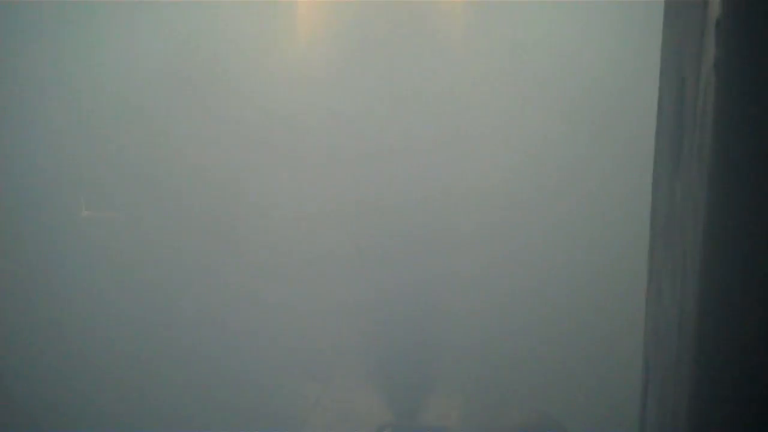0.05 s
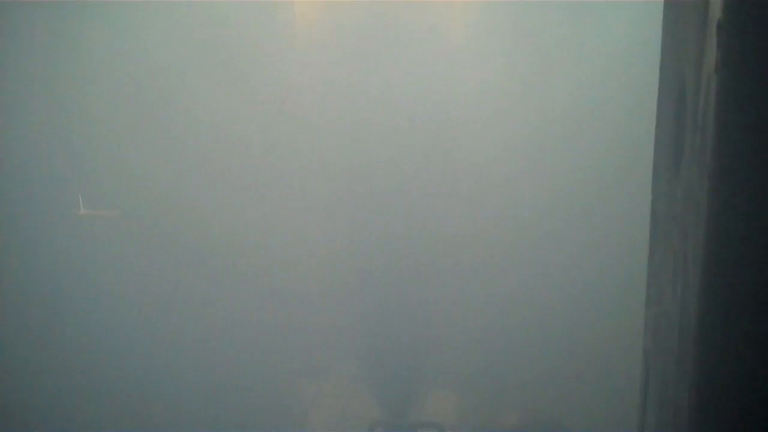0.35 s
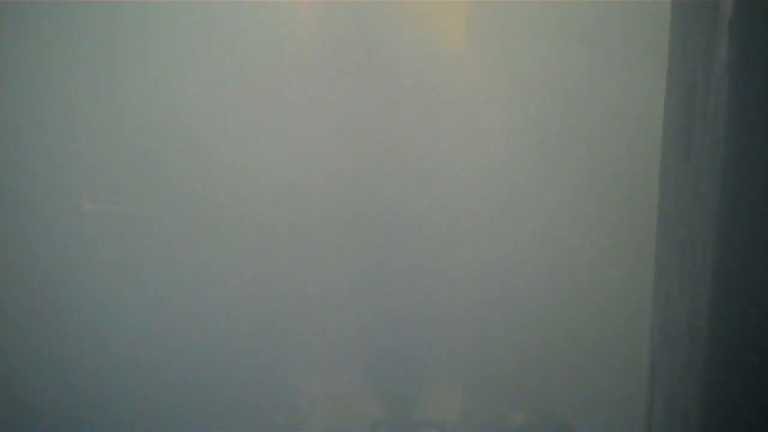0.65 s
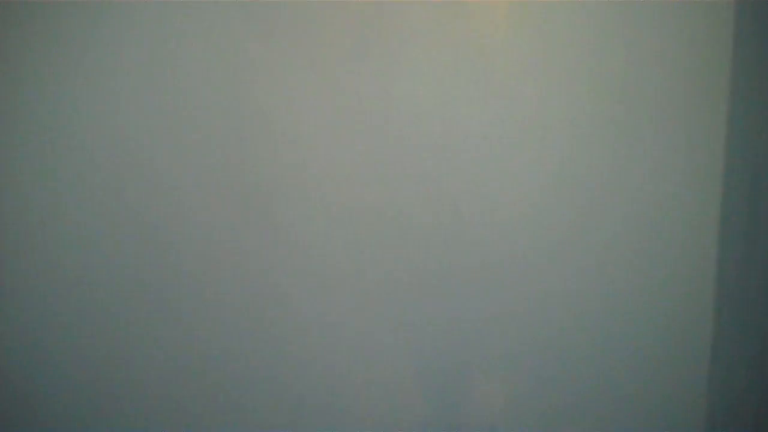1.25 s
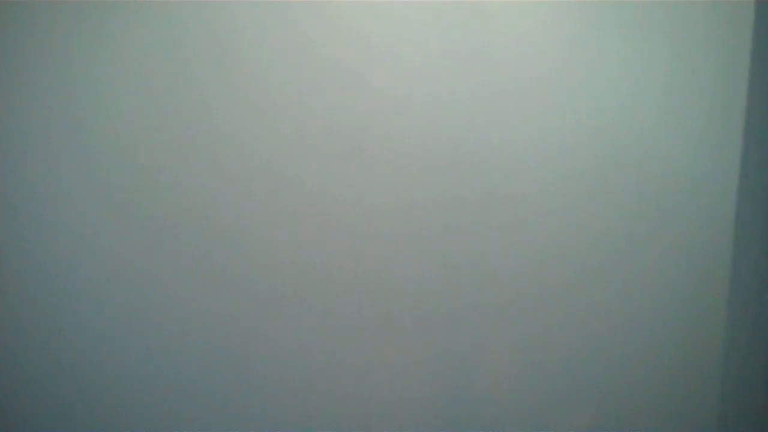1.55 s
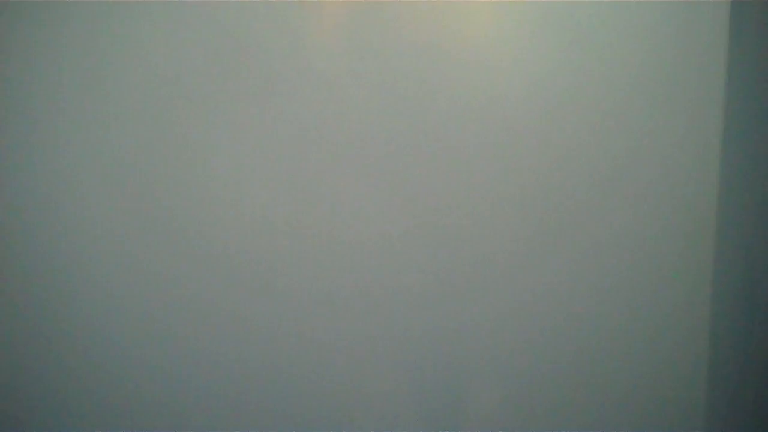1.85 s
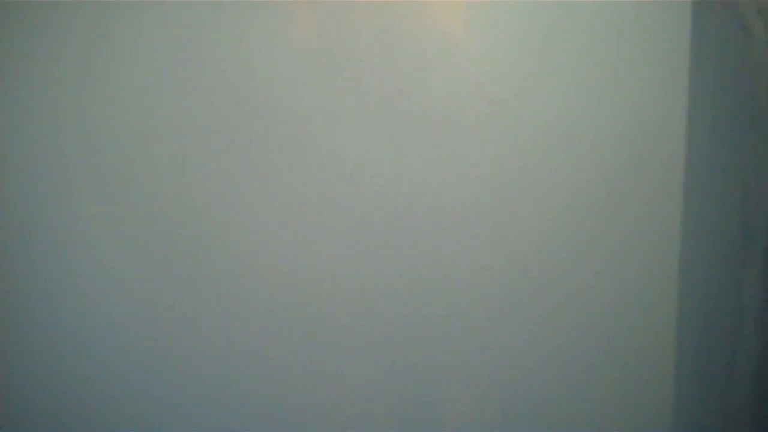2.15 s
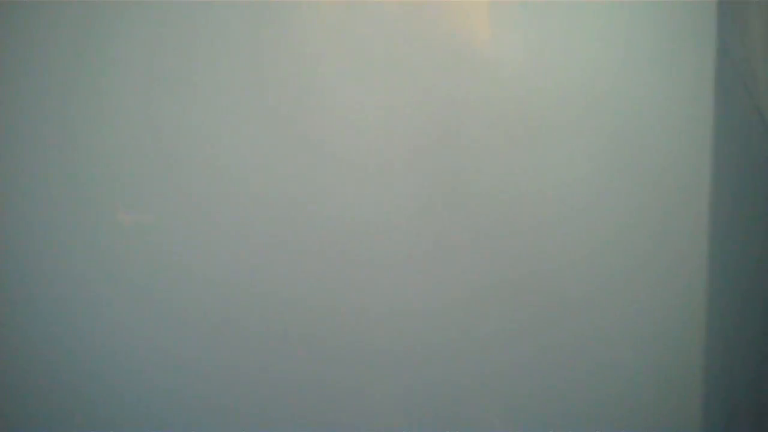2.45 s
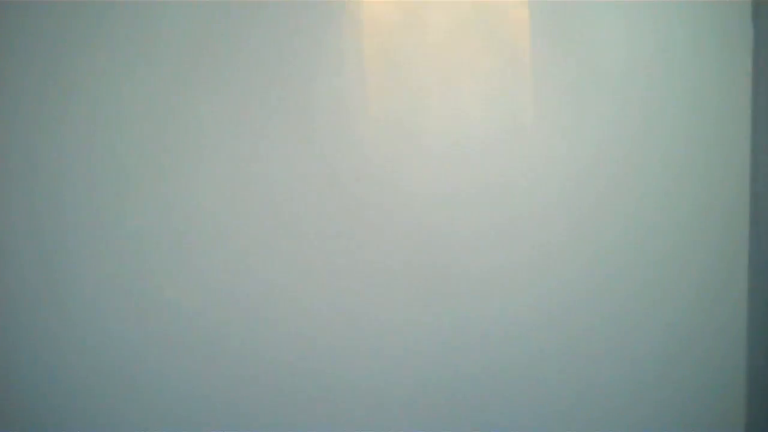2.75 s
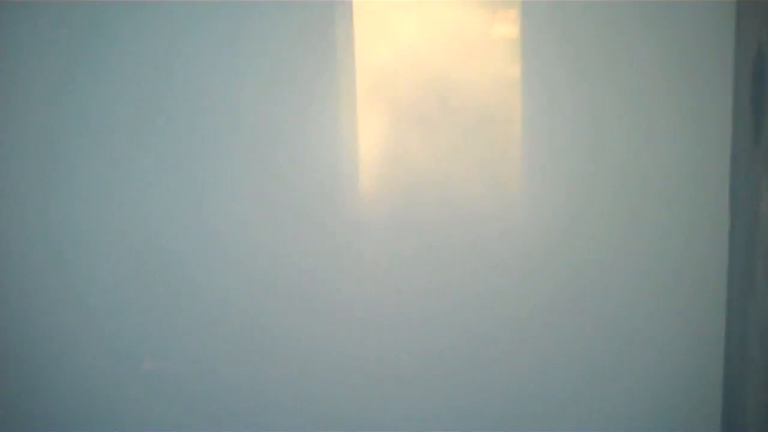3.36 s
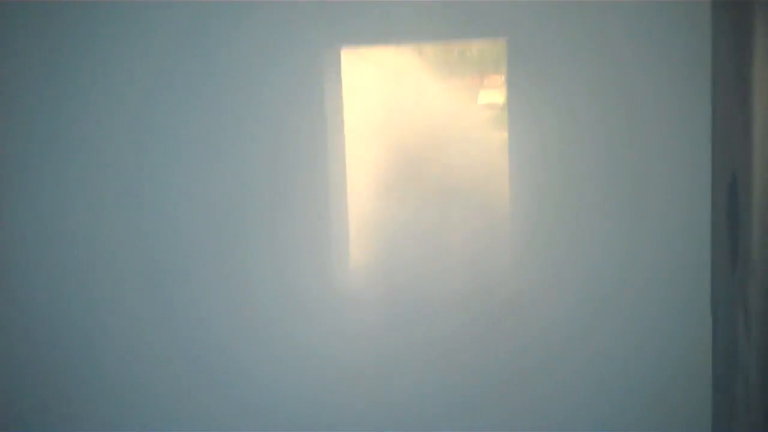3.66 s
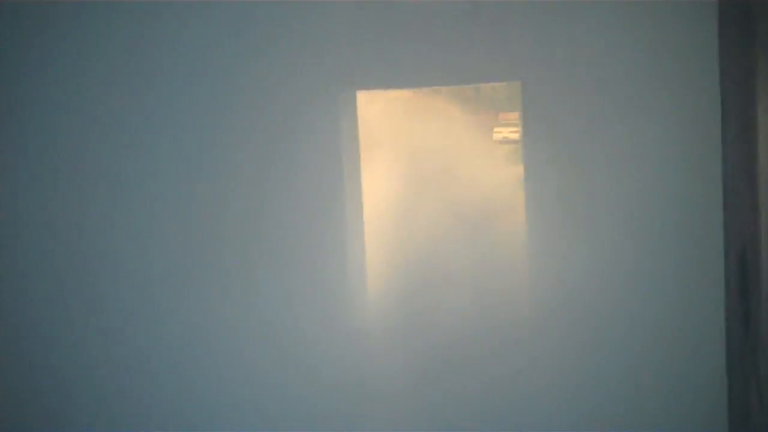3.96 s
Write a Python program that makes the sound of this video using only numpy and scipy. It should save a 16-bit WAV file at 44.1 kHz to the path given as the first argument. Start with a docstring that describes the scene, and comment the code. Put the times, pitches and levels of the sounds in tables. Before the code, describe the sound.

Water sprays from a nearby hose nozzle in a bare room. It starts as a soft hiss, swells to a loud, steady rush with splashing, then drums on the far wall as the aim shifts.

```python
"""A bare, smoky room. A hose nozzle sprays water: the jet breaks up in a soft hiss, then the valve
opens over a second to a full rush. The water roars and splashes as it lands, rings the room's
resonances and drums on the far wall as the aim shifts. The nozzle rings faintly as the valve moves.
A draught brushes the microphone at the start; its two ports ring at different treble pitches."""
import sys
import numpy as np
from scipy import signal
from scipy.fft import rfft, irfft
from scipy.io import wavfile

SR = 44100
rng = np.random.default_rng(int(sys.argv[2]) if len(sys.argv) > 2 else 0)


def master(y):
    """Save y as 16-bit WAV."""
    cut = np.clip(np.atleast_2d(y).T, -1, 1)
    pcm = np.round(cut * 32767)  # scale
    wavfile.write(sys.argv[1], SR, pcm.astype(np.int16))


N = 176400

# Nozzle flow. Each row: time in seconds, level in dB.
FLOW_DB = [(0.0,-53.5),(0.15,-54),(0.28,-52),(0.6,-54),(0.74,-52.5),(0.85,-54),(0.98,-48),(1.19,-44),(1.38,-41.5),(1.67,-37.7),(1.74,-37.5),(1.82,-36),(1.92,-37),
           (2.2,-37),(2.32,-35.5),(2.42,-37.2),(2.64,-36.5),(2.69,-35.8),(3.03,-36.5),(3.25,-37.5),(3.55,-37),(3.68,-37.5),(3.79,-36.5),(3.88,-38),(4.0,-37)]
# Jet breakup. Each row: frequency in Hz, spectral density in dB.
HISS_SPECTRUM = [(280,-30),(450,-7.5),(950,-11),(1360,-2.5),(1520,0),(1750,-1),(2000,1),(2300,1.5),(2900,0.5),(3400,1),(4200,0.5),(5000,0.5),(14000,-2)]
# Lower part of the hiss, thinned by low flow and aim. Each row: time in seconds, gain in dB.
HISS_BODY_DB = [(0,-1.3),(0.85,-0.5),(1.6,0),(2.3,-0.8),(3.1,0.4),(3.6,-1),(4,0)]
# Landing water. Each row: frequency in Hz, spectral density in dB.
ROAR_SPECTRUM = [(25,-43),(50,-31),(70,-28),(105,-19),(150,-11),(280,-6.5),(340,-5),(600,-3),(800,6.5),(1000,-3),(1300,-13),(2500,-15.5)]
# Near splash. Each row: frequency in Hz, spectral density in dB.
SPLASH_SPECTRUM = [(250,-25),(340,-10),(480,-17.5),(580,7),(720,0.5),(880,-5),(1060,5),(1330,-19),(1570,-3),(1850,-17),(2300,-18),(3200,-21.5)]
# Splash against aim. Each row: time in seconds, level in dB relative to the flow.
SPLASH_DB = [(0,-17),(1.0,-16),(1.7,-12),(2.55,-11.5),(3.0,-29),(3.4,-28),(4,-17)]
# Room modes. Each row: frequency in Hz, width in Hz, gain in dB, dB of change per dB of flow.
ROOM_RESONANCES = [(89,9.4,-39.5,1.15),(123,13,-38.5,0.88),(175.2,27,-38.5,0.93),(331.6,33,-31,0.48),(350.5,13.3,-23,1.33),(386,13,-24.5,0.91),(438.3,27,-24,1),(490.2,13.6,-16,1.28),(546,7,-24,1),(621.6,18.5,-25,0.63),(727.2,23,-19.5,1.1),(869.4,36,-23,0.5),(956.4,16.6,-20,0.96),(1026,23,-25.5,1.6),(1143,17,-24,0.95),(1248.4,31,-24,0.88),(1497,78,-28.5,0.66),(2090,21,-36,0.62),(2293,22,-28,1.8),(3410,39,-37,1)]
# Far wall modes. Each row: frequency in Hz, width in Hz, gain in dB.
WALL_RESONANCES = [(441,14,-22),(551,12,-22),(658.4,18,-18),(727,33,-18),(787,37,-19.5),(865,54,-16)]
# Jet on the wall. Each row: time in seconds, gain in dB.
WALL_HIT_DB = [(0,-48),(2.5,-17),(2.64,-8),(2.72,1.5),(2.83,-3),(2.93,-1.5),(3.1,-3),(3.45,-1.5),(3.63,-4),(3.72,0),(3.87,-1.5),(4,-8)]
# Wall brightness against aim. Each row: time in seconds, tilt in dB per octave.
WALL_TILT_DB_PER_OCT = [(2.6,3),(2.74,-8),(2.88,0),(3.1,0),(3.45,3),(3.72,0),(3.87,3),(4,3)]
# Late boom. Each row: time in seconds, level in dB relative to full flow.
BOOM_DB = [(3.3,-55),(3.58,-29),(3.88,-30.5),(4,-37)]
# Door frame and floor echoes. Each row: delay in ms, gain in dB.
ECHOES = [(2.7,-20),(5.9,-16),(8.3,-17.5),(13.1,-22),(21.4,-18.5)]
# Valve movements. Each row: time of the peak in seconds, gain in dB.
VALVE_MOVES = [(0.21,-62.5),(0.97,-57)]
# Nozzle modes. Each row: frequency in Hz, width in Hz, gain in dB.
NOZZLE_RESONANCES = [(854,32,-5.5),(955,25,-5.5)]
# Draught strength. Each row: time in seconds, level in dB.
DRAUGHT_DB = [(0,-58.5),(.14,-61.5),(.24,-65),(.34,-76),(.45,-76),(.54,-100)]
# Fresh draught. Each row: frequency in Hz, spectral density in dB.
FRESH_AIR_SPECTRUM = [(12,-10),(22,3),(55,2),(85,-13),(125,-26),(400,-53)]
# Slack draught. Each row: frequency in Hz, spectral density in dB.
SLACK_AIR_SPECTRUM = [(12,-4),(28,2),(45,-6),(80,-31),(400,-62)]
# Stereo likeness. Each row: frequency in Hz, left-right correlation from -1 to 1.
CORRELATION = [(100,0.99),(300,0.99),(850,0.98),(1300,.87),(2200,.91),(2900,0.88),(3600,0.56),(5200,0.49),(6300,0.29),(7200,0.16),(9000,0.059),(13000,-0.15)]
# Microphone ports. Each row: frequency in Hz, gain in dB.
LEFT_PORT_DB = [(3500,0.5),(5000,1),(6400,4),(7000,7.5),(7350,9),(7700,8.5),(8200,3.5),(9000,-1),(10200,-6),(14000,-10)]
RIGHT_PORT_DB = [(3500,0.5),(4900,2.5),(5800,8),(6300,9.5),(6900,1.5),(7400,-0.5),(8000,-5.5),(9000,-12.5),(10100,-16),(11500,-18.5),(14000,-28)]

BIN_HZ = np.arange(N // 2 + 1) * SR / N
TIME_S = np.arange(N) / SR


def from_db(db):
    return 10 ** (np.asarray(db) / 20)


def unit_rms(x):
    return x / np.sqrt(np.mean(x ** 2) + 1e-20)


def in_time(rows):
    return np.interp(TIME_S, *np.transpose(rows))


def at_hz(rows, hz):
    row_hz, value = np.transpose(rows)
    return np.interp(np.log(hz + 1e-9), np.log(row_hz), value)


def coloured(x, spectrum):
    gain = from_db(at_hz(spectrum, np.arange(N + 1) * SR / (2 * N)))
    return irfft(rfft(x, 2 * N) * gain)[..., :N]


def drift(rate_hz):
    """Low-passed random wander, rms 1."""
    return unit_rms(irfft(rfft(rng.standard_normal(N)) / (1 + (BIN_HZ / rate_hz) ** 2), N))


def stereo(pair):
    """Two independent signals to left and right: alike in the bass, apart in the treble."""
    alike = at_hz(CORRELATION, BIN_HZ)
    mid, side = rfft(pair)
    return irfft(np.sqrt(1 + alike) * mid + np.sqrt(1 - alike) * side * [[1], [-1]], N)


def turbulence(spectrum, flicker_db, rate_hz):
    """Stereo noise in 14 bands, each wandering by flicker_db; rms 1."""
    white = rfft(stereo(rng.standard_normal((2, N))))
    band = np.searchsorted(np.geomspace(200, 12000, 13), BIN_HZ)
    noise = sum(irfft(white * (band == k), N) * from_db(flicker_db * drift(rate_hz)) for k in range(14))
    return unit_rms(coloured(noise, spectrum))


def ringing(hz, width_hz):
    """Noise-driven resonance as two independent signals, rms 1."""
    response = 1 / (1 + 1j * (BIN_HZ - hz) / (.78 * width_hz)) ** 2
    return unit_rms(irfft(rfft(rng.standard_normal((2, N))) * response, N))


def jet(flow_db, drops_per_s=2500, patter_db=-11, flutter_db=0.71, body_edge_hz=3900):
    """The jet breaks up into a fluttering hiss and a fine patter of drops."""
    hiss = turbulence(HISS_SPECTRUM, flicker_db=0.7, rate_hz=10.5)
    drop_db = 0.5 * np.minimum(rng.exponential(1, (2, N)), 5)
    polarity = rng.choice([-1, 1], (2, N))
    hits = rng.random((2, N)) < drops_per_s / SR
    patter = unit_rms(coloured(stereo(from_db(drop_db) * polarity * hits), HISS_SPECTRUM))
    level_db = flow_db + 0.5 + flutter_db * drift(rate_hz=68)
    spray = from_db(level_db) * (hiss + from_db(patter_db) * patter)
    body = irfft(rfft(spray) / (1 + (BIN_HZ / body_edge_hz) ** 10), N)
    return spray - body + from_db(in_time(HISS_BODY_DB)) * body


def sizzle(level_db=-69):
    """Thin, steady nozzle sizzle, heard while the flow is low."""
    return from_db(level_db) * stereo(ringing(hz=7355, width_hz=410))


def landing(flow_db, roar_db=-14):
    """Water lands in a broad roar; the near splash dips as the aim moves away."""
    roar = turbulence(ROAR_SPECTRUM, flicker_db=0, rate_hz=14)
    splash = turbulence(SPLASH_SPECTRUM, flicker_db=1, rate_hz=21)
    return from_db(flow_db + roar_db) * roar + from_db(flow_db + in_time(SPLASH_DB)) * splash


def room(flow_db, full_flow_db, gain_db=-2.5):
    """Drops keep the room's modes ringing; each follows the flow by its own amount."""
    swing_db = flow_db - full_flow_db
    return sum(from_db(full_flow_db + gain_db + db + follows * swing_db) * ringing(hz, width_hz)
               for hz, width_hz, db, follows in ROOM_RESONANCES)


def wall(flow_db, pivot_hz=650):
    """The jet drums on the far wall, deep at first, brighter as the aim shifts."""
    hit_db = flow_db + in_time(WALL_HIT_DB)
    tilt_db_per_oct = in_time(WALL_TILT_DB_PER_OCT)
    return sum(from_db(hit_db + db + tilt_db_per_oct * np.log2(hz / pivot_hz)) * ringing(hz, width_hz)
               for hz, width_hz, db in WALL_RESONANCES)


def boom(full_flow_db):
    """The landing water adds a low boom near the end."""
    return from_db(full_flow_db + in_time(BOOM_DB)) * ringing(hz=227, width_hz=42)


def doorway(direct, sway_ms=0.073, sway_hz=0.62):
    """Short echoes comb the hiss; their delays wander as the holder sways."""
    now_ms = 1000 * TIME_S
    combed = direct
    for delay_ms, db in ECHOES:
        then_ms = now_ms - delay_ms - sway_ms * drift(sway_hz)
        echo = np.array([np.interp(then_ms, now_ms, side, left=0) for side in direct])
        combed = combed + from_db(db) * echo
    return combed


def draught(slacken_s=0.17):
    """Moving air rumbles on the microphone, sinks in pitch and dies away."""
    air = stereo(rng.standard_normal((2, N)))
    fresh = unit_rms(coloured(air, FRESH_AIR_SPECTRUM))
    slack = unit_rms(coloured(air, SLACK_AIR_SPECTRUM))
    fresh_share = np.exp(-(TIME_S / slacken_s) ** 4)
    return from_db(in_time(DRAUGHT_DB)) * (fresh_share * fresh + (1 - fresh_share) * slack)


def valve(rise_s=0.037, fall_s=0.074):
    """The nozzle rings briefly at each valve movement."""
    swell = sum(from_db(db) * np.exp(-np.maximum((peak_s - TIME_S) / rise_s, (TIME_S - peak_s) / fall_s))
                for peak_s, db in VALVE_MOVES)
    ring = sum(from_db(db) * ringing(hz, width_hz) for hz, width_hz, db in NOZZLE_RESONANCES)
    return swell * stereo(ring)


def scene():
    """Spray, landing water and its resonances over draught and valve."""
    flow_db = in_time(FLOW_DB)
    full_flow_db = np.mean(flow_db[N // 2:])
    spray = doorway(jet(flow_db) + sizzle())
    water = landing(flow_db)
    resonances = stereo(room(flow_db, full_flow_db) + wall(flow_db) + boom(full_flow_db))
    return spray + water + resonances + draught() + valve()


def record(dry):
    """Each port colours its side; a steep low-pass cuts the top."""
    ports = np.array([coloured(dry[0], LEFT_PORT_DB), coloured(dry[1], RIGHT_PORT_DB)])
    low_pass = signal.ellip(14, .1, 80, 14200, fs=SR, output="sos")
    return signal.sosfilt(low_pass, ports)


dry = scene()
out = record(dry)
master(out)
```